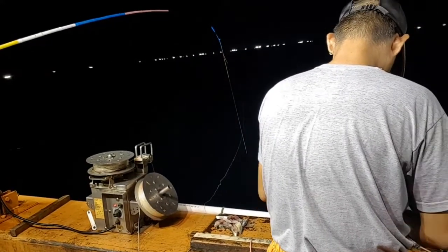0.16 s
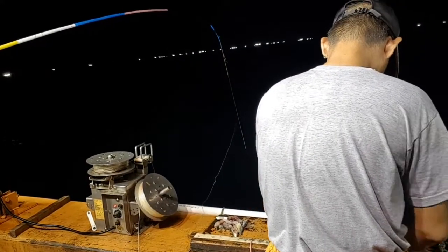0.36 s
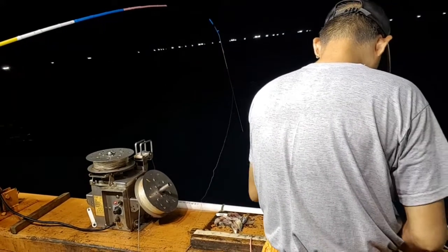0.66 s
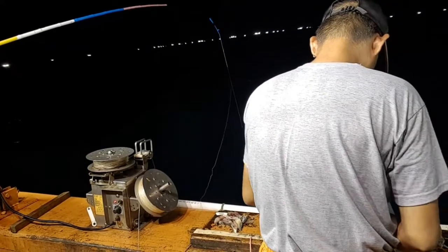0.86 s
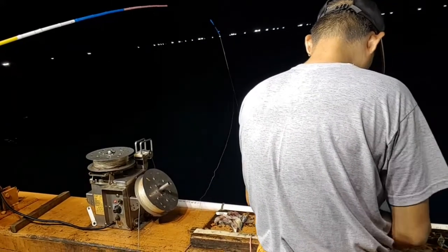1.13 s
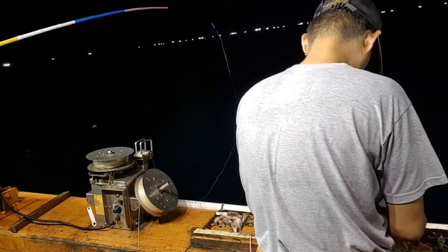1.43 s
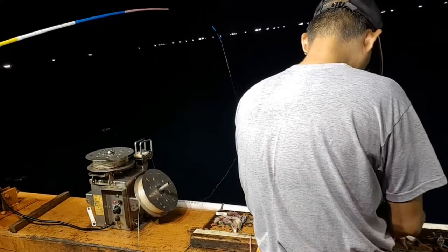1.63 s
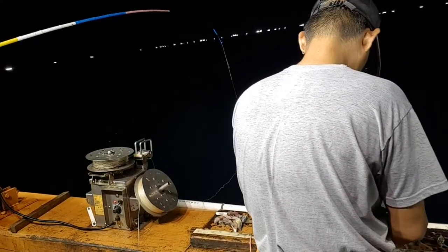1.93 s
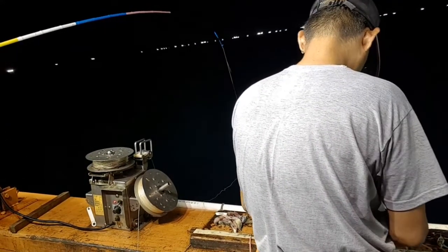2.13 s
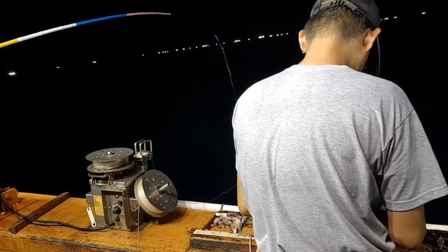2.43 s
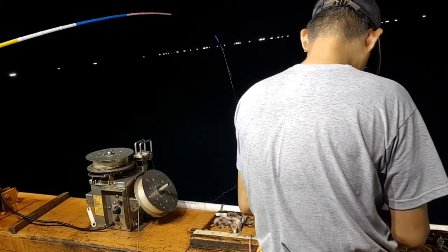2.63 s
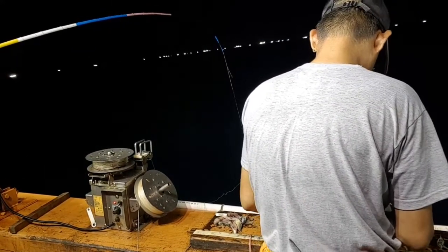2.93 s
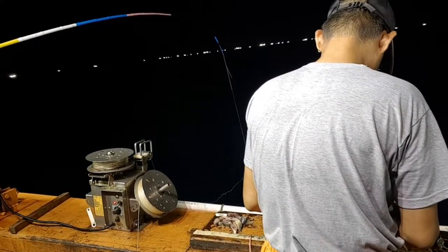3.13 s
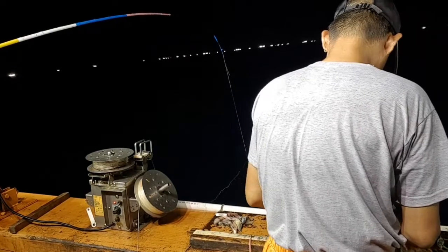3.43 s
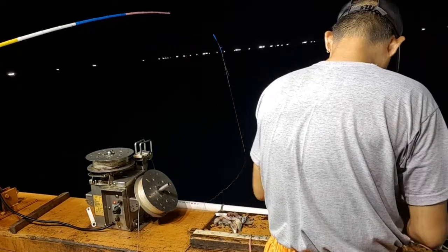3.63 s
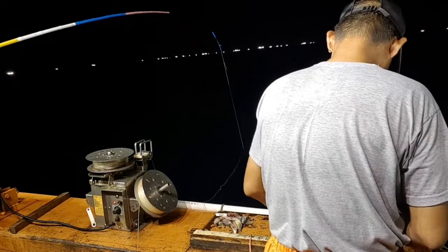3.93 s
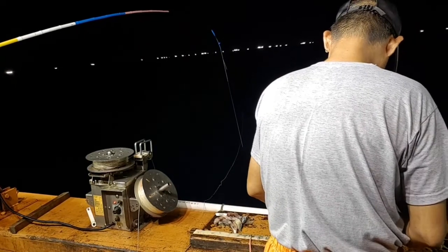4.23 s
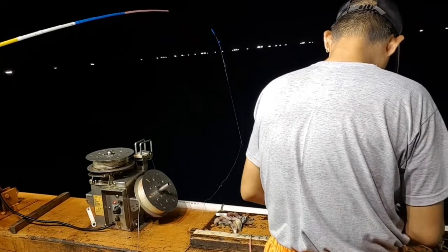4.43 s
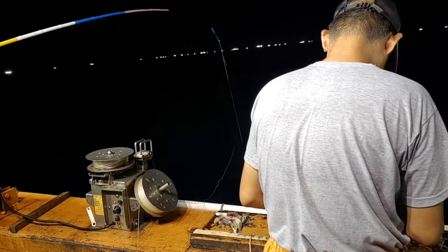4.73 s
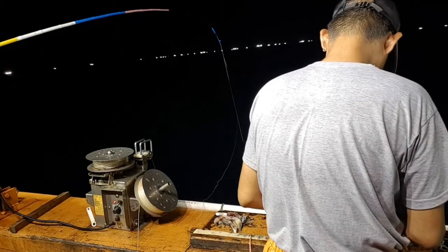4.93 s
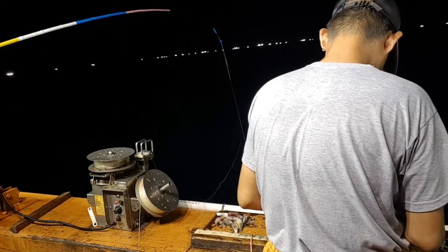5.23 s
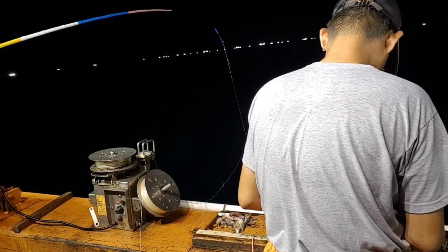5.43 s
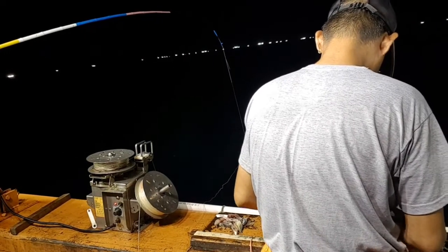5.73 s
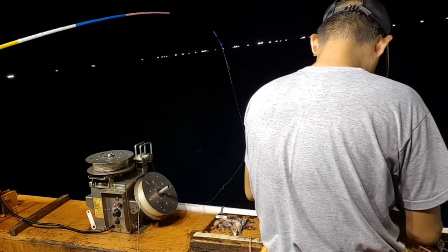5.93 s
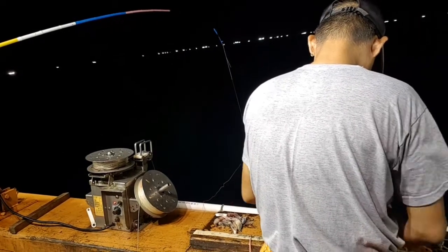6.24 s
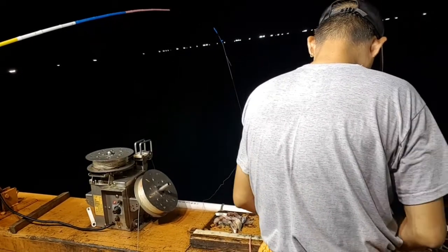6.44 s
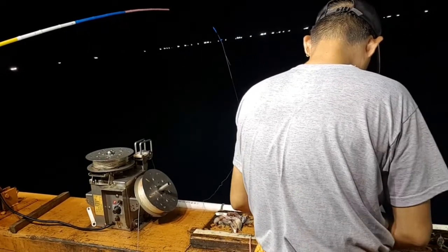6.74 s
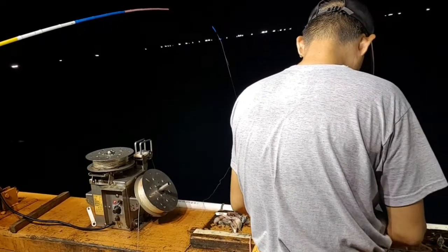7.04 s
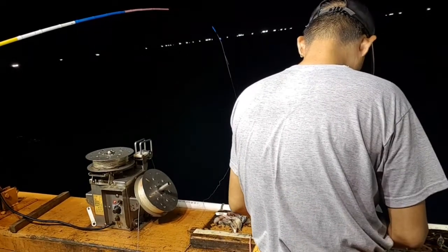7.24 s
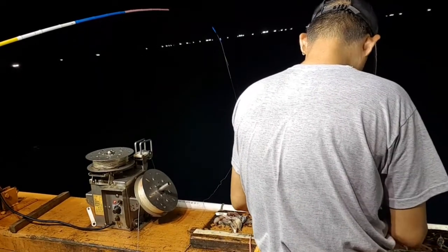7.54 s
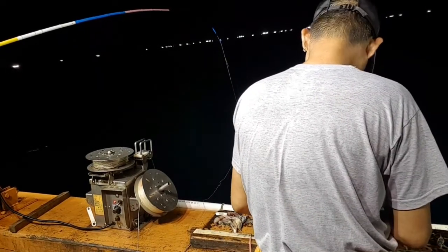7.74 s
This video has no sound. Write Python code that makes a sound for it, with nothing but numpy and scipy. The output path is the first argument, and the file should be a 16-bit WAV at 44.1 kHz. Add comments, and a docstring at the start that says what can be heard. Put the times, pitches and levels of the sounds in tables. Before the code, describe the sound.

Steady, dark engine noise fills the open deck from start to finish, low hum and rapid pulsing under a dull rushing roar, with only a trace of gear whine. The microphone stands near the rail, the engine below and to the left in wide stereo. Small handling sounds barely rise above it: a nearly buried soft swish first, then much later a small click, a weaker one, and a brief bright swish.

```python
"""A six-cylinder four-stroke boat diesel turns at a governed speed below deck, heard from the rail at night.
Its firing orders boom through exhaust and hull as sines locked to the crank, with gear whine above them.
Coloured noise makes the broad engine-room roar, and two steady sines a faint hum; the engine lies to the left.
From the angler nearby come two short swishes of brushed noise and two small tackle clicks that ring briefly."""
import sys
import numpy as np
from scipy import signal
from scipy.fft import rfft, irfft, next_fast_len
from scipy.io import wavfile
from scipy.ndimage import uniform_filter1d

SR = 44100
rng = np.random.default_rng(int(sys.argv[2]) if len(sys.argv) > 2 else 0)


def transcribe(u):
    """Save the signal u as a 16-bit wav file named by the first command-line argument.

    u: samples, shape (n,) or (channels, n), limited to [-1, 1]; the rate is SR.
    q: integer samples, one column per channel.
    """
    v = np.clip(np.atleast_2d(u).T, -1, 1)
    q = np.round(v * 32767).astype(np.int16)
    wavfile.write(sys.argv[1], SR, q)


N = 347067   # length in samples

RPM = 1795.2   # governed speed
CYCLE_HZ = RPM / 120   # one engine cycle takes two turns


def from_db(db):
    """Decibels to gain."""
    return 10 ** (np.asarray(db) / 20)


def in_time(rows):
    """Table columns as one value per sample."""
    seconds, *columns = np.transpose(rows)
    return [np.interp(np.arange(N) / SR, seconds, column) for column in columns]


def at_hz(points, hz):
    """Read a (Hz, value) table on a log-frequency axis."""
    table_hz, values = np.transpose(points)
    return np.interp(np.log(hz), np.log(table_hz), values)


def drift(rate_hz):
    """Slow chance of spread 1: coarse noise, one value per 100 samples, through a double one-pole low-pass."""
    pole = np.exp(-2 * np.pi * rate_hz * 100 / SR)
    coarse = rng.standard_normal(N // 100 + 1002)
    slow = signal.lfilter([1], [1, -2 * pole, pole * pole], coarse)[1000:]   # drop the filter's start
    return np.interp(np.arange(N) / 100, np.arange(len(slow)), slow / slow.std())


# Stereo image. Each row: frequency in Hz, left over right in dB.
LEFT_OVER_RIGHT_DB = [(25, 0.5), (50, 5), (180, 5), (300, 5), (1100, 2.5), (1750, -1.5), (2700, 4),
                      (4600, 6), (6400, 2), (8800, 8.5), (15000, 2.5)]
# Each row: frequency in Hz, likeness of the two channels from 0 to 1.
CHANNEL_LIKENESS = [(25, 0.4), (60, 1), (150, 0.8), (350, .9), (600, .85), (900, .75), (1400, 0.7),
                    (1900, 0.4), (2400, .4), (4500, 0.3)]
# Each row: frequency in Hz, phase by which the left channel leads in radians.
LEFT_LEAD_RAD = [(20, 0.05), (150, 0.05), (180, 0.38), (400, 0.72), (860, 1.6), (1500, 3.55), (3300, 9.5),
                 (15000, 29)]


def stereo_noise(db_at):
    """Noise of a given dB per Hz on the left; the right has its own phase lag, level and partly unlike noise."""
    size = next_fast_len(N)
    hz = np.maximum(np.arange(size // 2 + 1) * SR / size, 1)
    white = rfft(rng.standard_normal((2, size))) * np.sqrt(SR / 2)
    shared, own = white * from_db(db_at(hz))
    alike = np.clip(at_hz(CHANNEL_LIKENESS, hz), 0, 1)
    lead = np.interp(hz, *np.transpose(LEFT_LEAD_RAD))
    right = alike * shared * np.exp(-1j * lead) + np.sqrt(1 - alike ** 2) * own
    right = right / from_db(at_hz(LEFT_OVER_RIGHT_DB, hz))
    return irfft([shared, right], size)[:, :N]


FIRST_IN_STEP, LAST_IN_STEP = 4, 12   # these orders beat together, as one throb per engine cycle
STEP_SCATTER = 0.1   # share of a full turn by which they stray
THUMP_LAG_S = 0.015   # the part of the throb below the firing rate comes this much later


def tone(cycle, order, left_db, right_db):
    """One multiple of the cycle angle at the given rms levels, with the left channel leading in phase."""
    stray = STEP_SCATTER if order in range(FIRST_IN_STEP, LAST_IN_STEP + 1) else 1
    late = 2 * np.pi * CYCLE_HZ * THUMP_LAG_S * max(6 - order, 0)
    angle = order * cycle + late + stray * rng.uniform(-np.pi, np.pi)
    lead = np.interp(order * CYCLE_HZ, *np.transpose(LEFT_LEAD_RAD))
    left = from_db(left_db) * np.sin(angle)
    right = from_db(right_db) * np.sin(angle - lead)
    return np.sqrt(2) * np.array([left, right])


# The two main tones swell and sink. Each row: time in seconds, boom at twice the firing rate in dB,
# tone at the firing rate in dB, both before the left and right offsets.
MAIN_TONE_SWELL = [(0.1, -20, -27.5), (0.2, -19, -24.5), (0.76, -17, -28), (1.29, -18.5, -25),
                   (1.78, -15.5, -27.5), (2.02, -16.5, -26.5), (2.93, -20, -27.5), (3.02, -19.5, -25.5),
                   (3.38, -19, -28.5), (3.74, -18.5, -27.5), (3.98, -19, -29), (4.3, -18, -26),
                   (4.49, -19, -25.5), (4.83, -17.5, -27.5), (6.72, -17.5, -25.5), (6.81, -16.5, -26),
                   (7.32, -19.5, -26), (7.75, -16.5, -26.5)]
SWELL_DB, SWELL_FOLLOWS = 0.64, 0.11   # spread of the slow swell, share of the boom's swing


def engine_swell():
    """Levels of boom and firing tone, and the slow swell of the other orders and roar, which follows the boom."""
    boom_db, firing_db = in_time(MAIN_TONE_SWELL)
    swell_db = SWELL_FOLLOWS * (boom_db - boom_db.mean()) + SWELL_DB * drift(0.93)
    return boom_db, firing_db, swell_db


# The other orders of the two-turn engine cycle.
# Each row: order, left rms in dB, right rms in dB, both before swell and waver.
ENGINE_ORDERS = [(2, -51, -55.5), (3, -49.5, -56), (4, -34.5, -38.5), (5, -43, -44), (7, -38.5, -43),
                 (8, -38, -38), (9, -43, -49), (10, -45.5, -52), (11, -41, -44), (13, -43, -44.5),
                 (14, -42.5, -43), (15, -44, -48), (17, -52, -57), (18, -42, -47.5), (20, -42, -45.5),
                 (21, -47.5, -51.5), (22, -49, -51), (26, -38, -39.5), (27, -44.5, -49), (28, -49.5, -53.5),
                 (30, -45.5, -51.5), (31, -54.5, -59.5), (36, -57, -62.5), (37, -53.5, -59.5),
                 (38, -53.5, -63), (39, -58.5, -65.5), (40, -56.5, -52.5), (42, -57, -63.8),
                 (49, -62, -66.5), (52, -65, -66), (54, -62.5, -66)]
# Gear and pump whine. Each row: order (played at the nearest whole one), left rms in dB, right rms in dB,
# both before swell and waver.
GEAR_WHINE = [(60, -68, -70.5), (68, -71, -69.5), (83.4, -74, -71.5), (111, -73.5, -71), (117, -74.5, -68),
              (128.3, -75.5, -74.5), (150, -75.5, -76), (168.3, -77, -78.5)]
HUNT_RPM, HUNT_HZ = 1.5, 1.0   # how far and how fast the governed speed hunts


def engine_tones(boom_db, firing_db, swell_db, waver_db):
    """Six firings in two turns: orders 6 and 12 lead, uneven cylinders fill in the rest."""
    speed_rpm = RPM + HUNT_RPM * drift(HUNT_HZ)
    cycle = 2 * np.pi * np.cumsum(speed_rpm) / 120 / SR
    out = tone(cycle, 12, boom_db + 2.2, boom_db - 2.6)
    out += tone(cycle, 6, firing_db + 1.6, firing_db - 1.9)
    for order, left_db, right_db in ENGINE_ORDERS + GEAR_WHINE:
        waver = swell_db + waver_db * drift(1.9)   # each order's level also wavers slowly and on its own
        out += tone(cycle, round(order), left_db + waver, right_db + waver)
    return out


# Broad roar on the left, before panels and ripple. Each row: frequency in Hz, level in dB per Hz.
ROAR_COLOUR = [(15, -76.5), (30, -71), (48, -58), (200, -59), (400, -62.5), (600, -66.5), (1000, -78.5),
               (1350, -81), (2000, -85.5), (3200, -89.5), (6600, -104), (8300, -100), (13000, -104),
               (16000, -108)]
# Hull and deck panels colour the roar. Each row: centre in Hz, width in Hz, boost or cut in dB.
HULL_PANELS = [(88.5, 20, -1.5), (188, 81, 6), (222, 15, 0.5), (274, 38, -2), (323.7, 32, 8),
               (359, 11, -6.5), (386, 29, 5), (440, 25, 4.5), (580, 80, 2.5), (715, 29, -2.5), (826, 53, 2),
               (945, 40, 2), (990, 40, -2), (1020, 66, 3.5), (1155, 34, -3), (1220, 66, 4), (1420, 150, 0),
               (1580, 110, 3), (1830, 110, 2.5), (2220, 96, -1.5), (2520, 150, -3.5), (2920, 400, 1)]


def roar(swell_db, flutter_db, ripple_db):
    """Air intake, cooling water and rattling plates merge into noise, coloured by the hull."""
    # countless small plate modes, one value per 8 Hz
    small_modes = uniform_filter1d(rng.standard_normal(2000), size=3) * np.sqrt(3)

    def colour_db(hz):
        """Roar spectrum with panel resonances, and ripple above 700 Hz that shrinks past 3 kHz."""
        panels_db = sum(db / (1 + (2 * (hz - centre_hz) / width) ** 2)
                        for centre_hz, width, db in HULL_PANELS)
        ripple = np.interp(hz / 8, np.arange(2000), small_modes)
        ripple = ripple * (hz > 700) * np.minimum(3000 / hz, 1)
        return at_hz(ROAR_COLOUR, hz) + panels_db + ripple_db * ripple

    return stereo_noise(colour_db) * from_db(swell_db + flutter_db * drift(14))


# A faint steady hum off the engine's orders, perhaps a pump or fan.
# Each row: multiple of the hum frequency, left rms in dB, right rms in dB.
HUM_PARTIALS = [(1, -50, -53.5), (2, -51, -55)]
HUM_HZ = 116.9


def hum():
    """Two steady partials that keep their own time, free of the engine's hunting."""
    steady = 2 * np.pi * CYCLE_HZ * np.arange(N) / SR
    return sum(tone(steady, multiple * HUM_HZ / CYCLE_HZ, left_db, right_db)
               for multiple, left_db, right_db in HUM_PARTIALS)


# Tone of the swish, relative only. Each row: frequency in Hz, level in dB per Hz.
SWISH_TONE = [(300, -59), (1200, -7), (2200, 3), (3600, -3.5), (6500, -12), (11000, -7), (16000, -10.5)]
# Line or cloth swishing. Each row: peak time in seconds, peak level in dB before raggedness,
# rise in seconds, fall in seconds.
SWISH_STROKES = [(1.6, -59.5, .13, .12), (6.358, -46.5, 0.073, .12)]
SWISH_SPAN_DB = 25.5   # level change over one rise or fall time


def swish(ragged_db):
    """A bright brush of noise that rises, catches and slips, and fades."""
    brush = stereo_noise(lambda hz: at_hz(SWISH_TONE, hz))
    t = np.arange(N) / SR
    stroke = 0
    for peak_s, peak_db, rise, fall in SWISH_STROKES:
        away = np.maximum((peak_s - t) / rise, (t - peak_s) / fall)   # 0 at the peak
        stroke = stroke + from_db(peak_db - SWISH_SPAN_DB * away)
    return brush / brush.std() * stroke * from_db(ragged_db * drift(90))


# Tackle clicks. Each row: start in seconds, level in dB before the trim and the ringing.
TACKLE_CLICKS = [(6.2494, -35), (6.3495, -49)]
# Ringing modes of the small hard part. Each row: frequency in Hz, level in dB, 60 dB decay time in seconds.
TACKLE_MODES = [(2750, -6, 0.0074), (3700, -3.5, 0.0055), (4630, 0.5, 0.0082), (5200, -9, .006),
                (6500, -11, .005), (7600, -14, .005), (10500, -16, .003)]


def tackle(rattle_db, rattle_t60):
    """Each click is a crack of a few ms with a faint dying rattle, ringing the short modes of a small hard part."""
    out = np.zeros(N)
    blows = np.full(N, 1e-18)   # not quite silent, for the filters' sake
    after = np.arange(4000) / SR
    for start_s, click_db in TACKLE_CLICKS:
        crack = from_db(-60 * after / 0.015)
        rattle = from_db(rattle_db - 60 * after / rattle_t60)
        burst = (crack + rattle) * rng.standard_normal(len(after))
        blows[round(start_s * SR):][:len(after)] += from_db(click_db - 21.0) * burst
    for k, (hz, level_db, t60) in enumerate(TACKLE_MODES):
        r, w = 10 ** (-3 / (t60 * SR)), 2 * np.pi * hz / SR
        ring = signal.lfilter([0, np.sin(w)], [1, -2 * r * np.cos(w), r * r], blows)
        out += (-1) ** k * from_db(level_db) * ring   # alternate signs
    return out * from_db([[1.5], [-1.5]])   # slightly left


def scene():
    """Engine tones, roar and hum, with the angler's small sounds on top."""
    boom_db, firing_db, swell_db = engine_swell()
    engine = engine_tones(boom_db, firing_db, swell_db, waver_db=0.5)
    engine = engine + roar(swell_db, flutter_db=0.55, ripple_db=1.82)
    angler = swish(ragged_db=2.0) + tackle(rattle_db=-11, rattle_t60=0.17)
    return engine + hum() + angler


CUTOFF_HZ = 15790


def record(dry):
    """An elliptic low-pass cuts the top steeply; it is run in on a mirrored lead-in."""
    lead_in = 2 * dry[:, :1] - dry[:, 2000:0:-1]
    low_pass = signal.ellip(14, 0.2, 70, CUTOFF_HZ, fs=SR, output="sos")
    return signal.sosfilt(low_pass, np.hstack([lead_in, dry]))[:, -N:]


dry = scene()
out = record(dry)
transcribe(out)
```